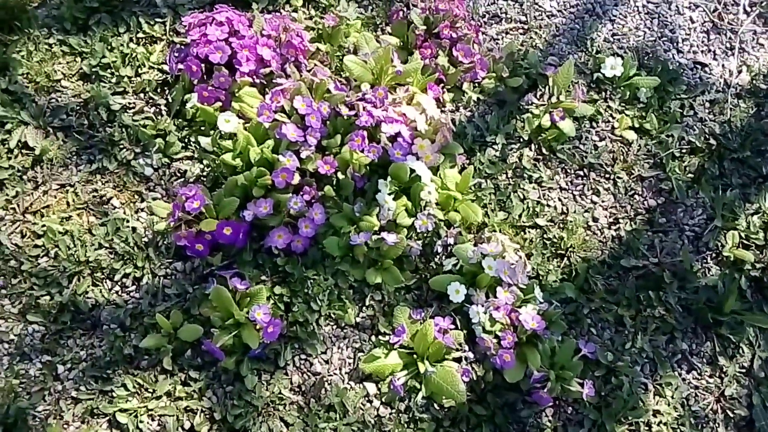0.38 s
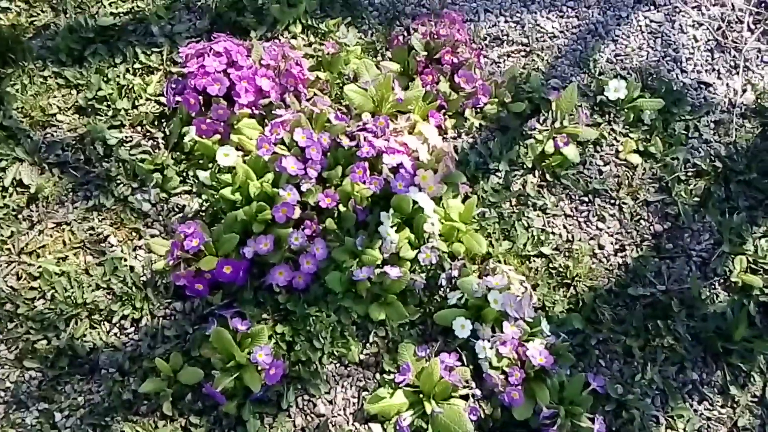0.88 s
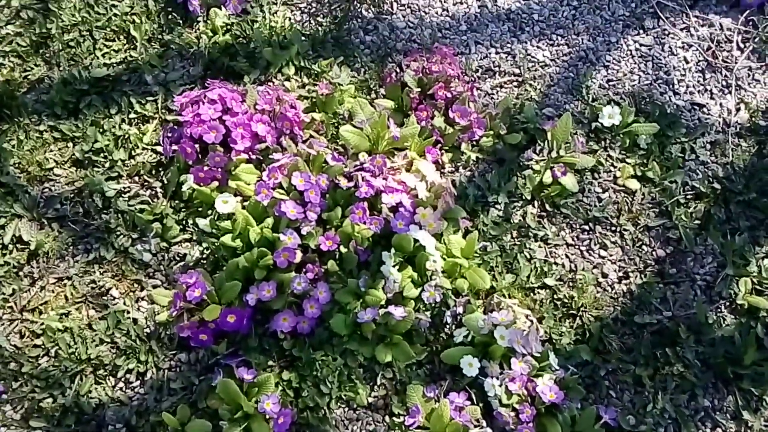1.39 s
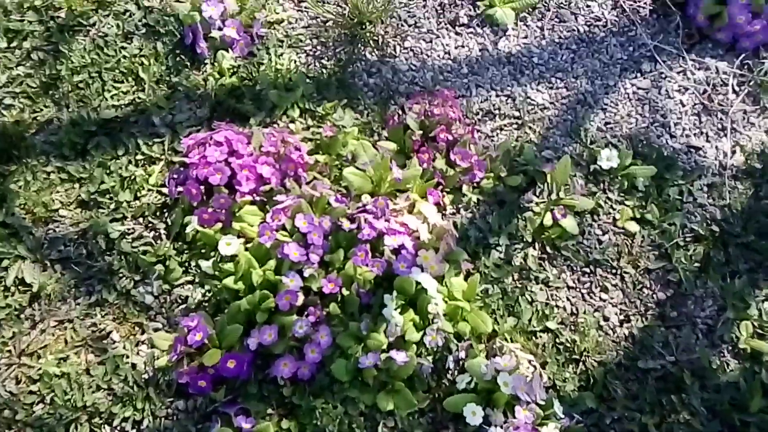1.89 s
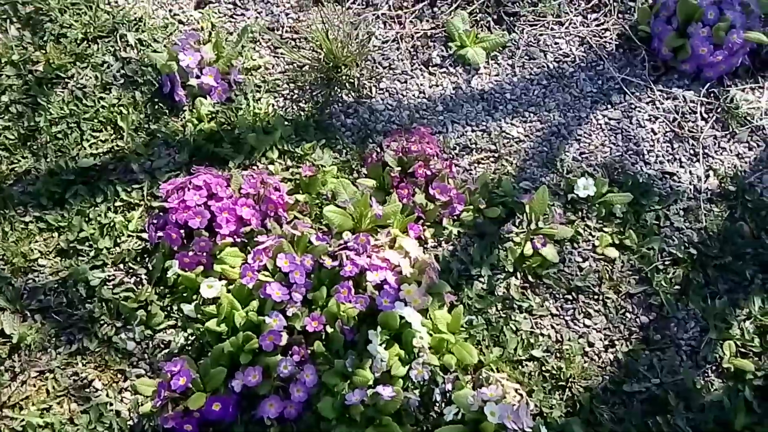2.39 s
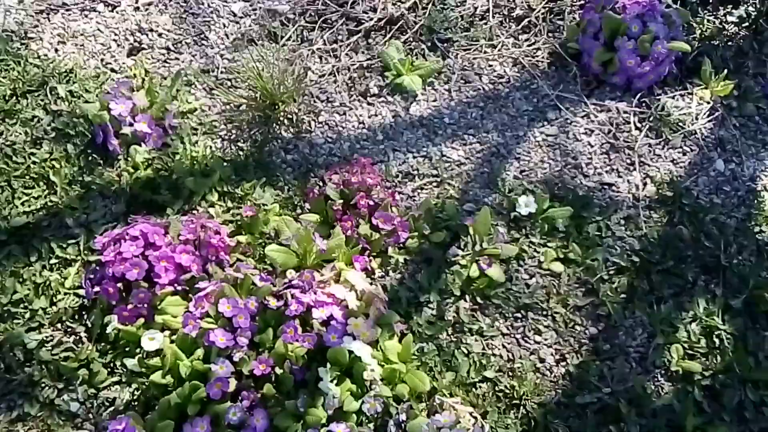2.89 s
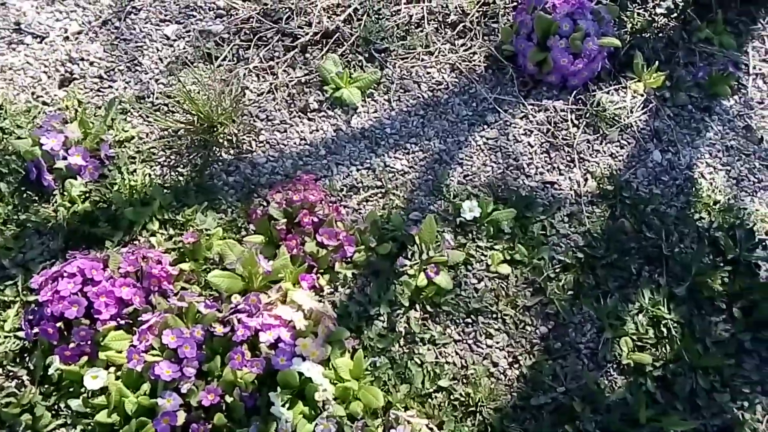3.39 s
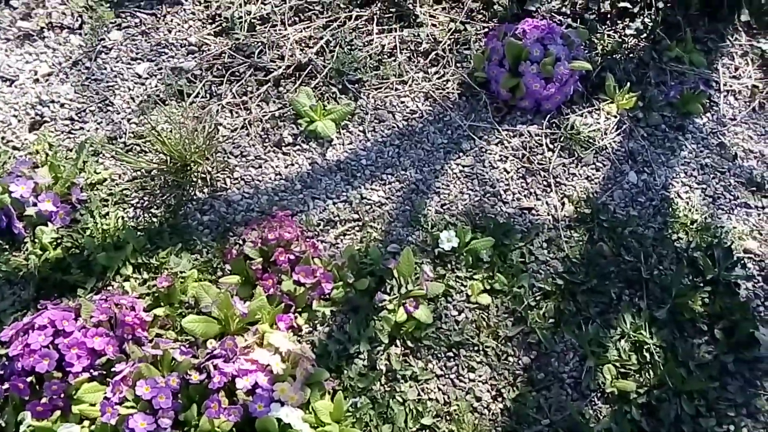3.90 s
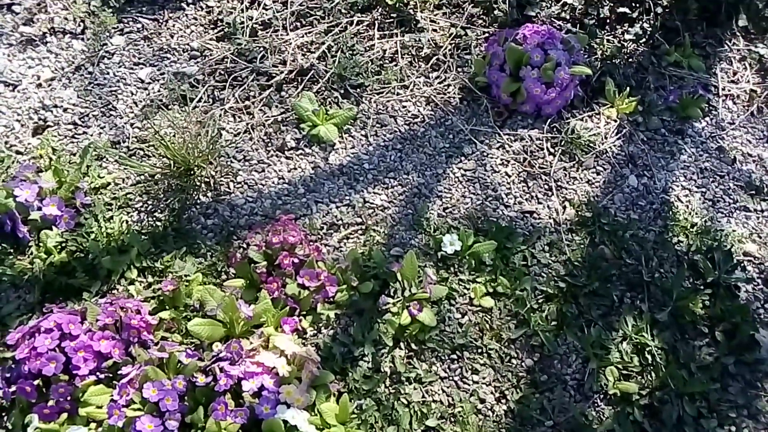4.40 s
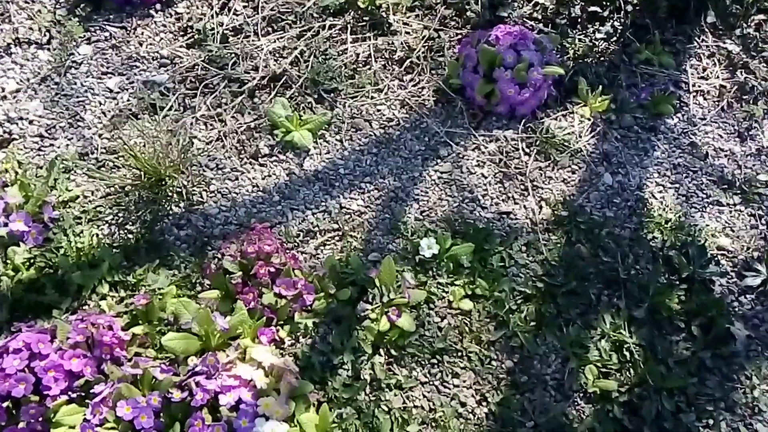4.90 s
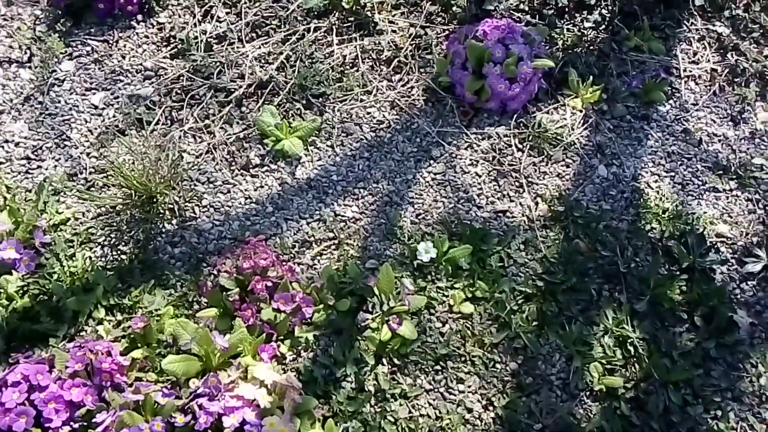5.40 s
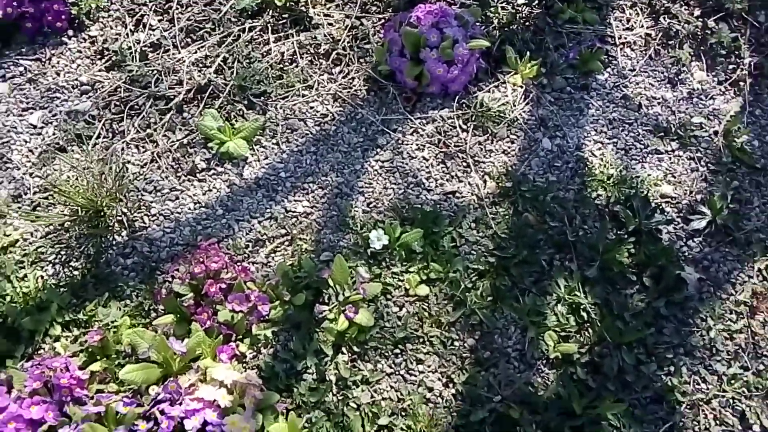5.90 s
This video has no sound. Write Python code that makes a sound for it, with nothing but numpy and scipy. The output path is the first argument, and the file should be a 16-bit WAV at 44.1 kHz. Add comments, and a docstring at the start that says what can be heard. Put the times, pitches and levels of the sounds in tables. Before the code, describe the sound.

Quick two-note birdsong over soft outdoor hiss and distant twitter, with two small knocks, gives way to heavy, lumpy wind thumps.

```python
"""Hiss, a far hum and faint wind rumble open this breezy garden; a small bird soon calls buzzy high and pure low notes.
Its notes are warbled or sinking sines with a late return off a far wall; other birds are short glides farther off.
Two small knocks nearby ring in short modes, and a soft hollow tone swells far away as flickering sine.
In the second half gusts buffet the microphone: lumpy filtered noise and single low swings of pressure."""
import sys
import numpy as np
from scipy import signal
from scipy.fft import rfft, irfft, next_fast_len
from scipy.io import wavfile

SR = 44100
rng = np.random.default_rng(int(sys.argv[2]) if len(sys.argv) > 2 else 0)


def boost_factor(decibels):
    """Convert a level in decibels to a linear amplitude factor."""
    exponent = np.asarray(decibels, float) / 20
    return 10 ** exponent


def unload_wav(signal):
    """Save mono or channel-first audio to the path in sys.argv[1] as 16-bit WAV at rate SR, clipped to [-1, 1]."""
    wavfile.write(
        sys.argv[1],
        SR,
        np.round(np.clip(np.atleast_2d(signal).T, -1, 1) * 32767).astype(np.int16),
    )


N = 265482   # samples
WARBLE_HZ = 206.02   # the bird's fast warble
GARDEN_T60_S = 0.28   # the garden's echoes die by 60 dB in this time


def rms_one(x):
    """Scale to unit power."""
    return x / np.sqrt(np.mean(np.abs(x) ** 2) + 1e-20)


def in_time(rows, t):
    """Each column of a curve, read at times t."""
    s, *columns = np.transpose(rows)
    return [np.interp(t, s, column) for column in columns]


def drift(rate_hz, size=N):
    """Slow chance: noise twice through a one-pole low-pass; spread 1."""
    pole = np.exp(-2 * np.pi * rate_hz / SR)
    settle = 8000   # samples dropped while the filter starts up
    noise = rng.standard_normal(size + settle)
    slow = signal.lfilter([1], [1, -2 * pole, pole * pole], noise)[settle:]
    return rms_one(slow - slow.mean())


def coloured(spectrum):
    """Noise with the given spectrum; rms 1."""
    size = next_fast_len(N)
    hz, db = np.transpose(spectrum)
    bins_hz = np.fft.rfftfreq(size, 1 / SR)
    shape = boost_factor(np.interp(np.log(bins_hz + 1), np.log(hz), db))
    return rms_one(irfft(rfft(rng.standard_normal(size)) * shape, size)[:N])


def band(x, low_hz, high_hz):
    """Butterworth band-pass."""
    return signal.sosfilt(signal.butter(2, [low_hz, high_hz], "band", fs=SR, output="sos"), x)


def add(out, start_s, sound):
    """Mix a sound in at its time."""
    i = max(round(start_s * SR), 0)
    out[i:i + len(sound)] += sound[:N - i]


def hump(t, length_s):
    """A smooth rise and fall centred on t = 0."""
    return np.cos(np.pi * np.clip(t / length_s, -.5, .5)) ** 2


def echoes(x, t60_s):
    """Many small reflections off leaves and walls: noise dying away, unit energy."""
    t = np.arange(0, t60_s, 1 / SR)
    paths = rng.standard_normal(len(t)) * boost_factor(-60 * t / t60_s)
    return signal.fftconvolve(x, paths / np.sqrt(np.sum(paths ** 2)))[:len(x)]


def whistle(hz, scattered, flutter_hz, spread_s=.0):
    """A sine of about rms 1; the share arriving by many echo paths flutters and, if spread in time, smears."""
    share = np.clip(scattered, 0, 1)
    paths = (drift(flutter_hz, size=len(hz)) + 1j * drift(flutter_hz, size=len(hz))) / np.sqrt(2)
    carrier = np.sqrt(2) * np.exp(2j * np.pi * np.cumsum(hz) / SR)
    late = np.real(carrier * paths)
    if spread_s:
        late = rms_one(echoes(late, spread_s))
    return np.sqrt(1 - share) * carrier.real + np.sqrt(share) * late


def background():
    """Hiss that breathes a little, a wavering hum and a far hollow tone that swells and fades."""
    t = np.arange(N) / SR
    # far machine hum: (time [s], level [dB])
    hum_level = [(0, -85), (2.9, -82.5), (3.4, -90), (6.02, -91)]
    hum = boost_factor(in_time(hum_level, t)[0]) * whistle(np.full(N, 296.25), 0.3, flutter_hz=5.5)
    # soft hollow tone far off: (time of the top [s], length [s], peak level [dB])
    swell_rows = [(3.955, 0.179, -74.5), (4.563, 0.174, -76), (4.852, 0.126, -70.5), (4.963, 0.096, -79.5),
                  (5.504, 0.129, -77)]
    swells = sum(boost_factor(db) * hump(t - s, length_s) for s, length_s, db in swell_rows)
    swell_hz = 551 * (1 + .07 * drift(4))
    hollow = swells * whistle(swell_hz, .95, flutter_hz=70)
    # far traffic, leaves and preamplifier hiss, spectrum shape: (frequency [Hz], relative level [dB per Hz])
    air_shape = [(35, -30.5), (60, -5.5), (134, 2), (242, -11.5), (340, -12), (500, -11.5), (1000, -17),
                 (2000, -21), (4200, -23.5), (6500, -27), (8000, -34), (13600, -35.5), (15000, -26),
                 (16000, -35)]
    hiss = boost_factor(-73 + 0.44 * drift(4.7)) * coloured(air_shape)
    return hiss + hum + hollow


def wind():
    """Turbulence on the microphone: lumpy rumble, an upper edge of changing strength, single lumps of pressure."""
    # gusts: (time [s], rumble level [dB], upper edge relative to the rumble [dB])
    gusts = [(0, -82, -1.5), (.46, -76, -2), (1.55, -78, -3.5), (2.1, -80, -1), (2.5, -75.5, -2.5),
             (3.25, -71, -5.5), (3.49, -81.5, -9.5), (3.56, -59, -2), (3.7, -45.5, -6.5), (3.79, -53.5, -1),
             (3.9, -52.5, -30.5), (4.0, -57.5, -24), (4.09, -52.5, 2), (4.16, -51.5, -24.5),
             (4.29, -69, -15), (4.39, -58, -18.5), (4.45, -70.5, -14.5), (4.6, -54, -13.5),
             (4.69, -54.5, -31), (4.85, -55, -20.5), (4.94, -69, -12), (5.05, -73, -8.5),
             (5.12, -57.5, 11.5), (5.2, -54.5, -11.5), (5.3, -54.5, -22.5), (5.75, -53, -24.5),
             (5.85, -41.5, -19.5), (5.92, -56, -25), (5.96, -54, 0), (6.0, -39.5, 9.5)]
    # spectrum shape of the rumble: (frequency [Hz], relative level [dB per Hz])
    rumble_shape = [(12, -49), (20, -27.5), (55, 4), (91, 3), (146, -1.5), (260, -27), (340, -49.5),
                    (570, -120)]
    # single lumps of pressure: (time of the top [s], peak level [dB], frequency [Hz], length [s])
    buffets = [(.383, -59.5, 139.3, 0.0404), (0.752, -62, 109.2, 0.035), (1.24, -62, 87, 0.0506),
               (3.004, -50, 70.6, 0.03304), (3.033, -55, 107.3, 0.0468), (3.287, -60.5, 119, 0.0275),
               (3.542, -45.5, 70.6, 0.061), (3.595, -30, 114.6, 0.0257), (3.618, -39, 97, 0.051),
               (3.657, -33, 130.3, 0.0152), (3.725, -35, 165, 0.0376), (3.739, -38, 105, .084),
               (3.751, -35, 80, 0.0324), (3.785, -27.5, 141, 0.0146), (3.84, -32.5, 81.6, 0.0458),
               (4.039, -34, 107.5, 0.0209), (4.09, -28, 108, 0.0247), (4.204, -47, 82.5, 0.0396),
               (4.381, -46, 92.3, 0.0274), (4.598, -40.5, 89, 0.0229), (4.814, -46.5, 110.6, 0.036),
               (4.879, -37.5, 93.2, 0.0227), (5.051, -42, 78.8, 0.044), (5.108, -33, 105.4, .033),
               (5.135, -29.5, 120.2, 0.0232), (5.162, -28.5, 116, 0.0114), (5.238, -36, 100.4, 0.0252),
               (5.294, -39.5, 83, 0.0392), (5.445, -42.5, 89, 0.0408), (5.468, -42, 87.2, 0.0234),
               (5.651, -45, 110.7, 0.0327), (5.812, -30, 86.7, 0.0221), (5.858, -29.5, 110.2, 0.0287),
               (5.979, -25.5, 108.8, 0.038), (6.01, -23.5, 138.2, 0.0119)]
    rumble_db, edge_db = in_time(gusts, np.arange(N) / SR)
    lumps = boost_factor(2.715 * drift(15))   # chance swings of level, spread in dB
    rumble = rms_one(lumps * coloured(rumble_shape))
    edge_noise = band(band(rng.standard_normal(N), 158.3, 274.1), 95, 330)
    edge = rms_one(lumps * edge_noise)
    out = boost_factor(rumble_db) * (rumble + boost_factor(edge_db) * edge)
    for s, db, hz, length_s in buffets:
        t = np.arange(-length_s / 2, length_s / 2, 1 / SR)
        swing = np.sin(2 * np.pi * hz * t + rng.uniform(0, 2 * np.pi))
        add(out, s + t[0], boost_factor(db) * np.hanning(len(t)) * swing)
    return out


def glides(rows):
    """Short whistled glides; the fainter the bird, the more its sound is scattered and wavers."""
    near_db, far_db = -67, -79.5   # between these levels a bird passes from near to far
    out = np.zeros(N)
    for s, length_s, start_hz, end_hz, db in rows:
        far = np.clip((near_db - db) / (near_db - far_db), 0, 1)
        t = np.arange(0, length_s, 1 / SR)
        sung = np.clip(np.minimum(t / 0.0048, (length_s - t) / 0.00934), 0, 1)   # rise and release [s]
        waver = 1 + (.005 + 0.0073 * far) * drift(90, size=len(t))
        hz = np.interp(t, [0, length_s], [start_hz, end_hz]) * waver
        add(out, s, boost_factor(db) * sung * whistle(hz, 0.22 + .5 * far, flutter_hz=70.3))
    return out


def far_birds():
    """Some chirps come clearly with the garden's echoes; the farthest arrive only as blurred twitter."""
    # clear chirps before echoes: (time [s], length [s], start pitch [Hz], end pitch [Hz], level [dB])
    chirps = [(.2, 0.044, 5940, 5800, -83.5), (.27, 0.073, 3142, 2998, -80.5),
              (.57, 0.049, 4170, 4184, -77.5), (.575, 0.02, 3200, 2930, -73.5),
              (.91, 0.066, 7435, 7225, -81.5), (1.08, 0.068, 4906, 4850, -82.5),
              (1.07, 0.076, 5522, 5572, -79.5), (1.4, 0.08, 5680, 5557, -78.5),
              (1.504, 0.029, 4190, 4112, -78.5), (1.865, 0.0482, 5250, 5200, -67),
              (2.425, 0.041, 5053, 5350, -72.5), (2.58, 0.0483, 3640, 3714, -78.5),
              (2.87, 0.042, 5188, 5485, -74.5), (3.188, 0.0188, 5167, 3531, -72.5),
              (3.26, 0.0347, 3750, 3750, -79), (3.279, 0.054, 6943, 7115, -80.5),
              (3.291, 0.0268, 5159, 5455, -60.5), (3.295, 0.089, 5833, 5655, -76.5),
              (3.34, .02, 6530, 6600, -79), (3.359, 0.0248, 4943, 2873, -78.5),
              (3.45, 0.069, 5250, 5346, -79.5), (3.49, 0.0163, 5144, 3200, -74.5),
              (3.98, 0.0297, 4973, 5177, -68), (4.06, 0.0134, 4990, 4580, -77.5),
              (4.214, 0.031, 3708, 3400, -79), (4.285, 0.0155, 3757, 3740, -79),
              (4.325, 0.0233, 3470, 2820, -77.5), (4.46, 0.0403, 5310, 4980, -78),
              (4.91, 0.0296, 3019, 2725, -75), (5.05, 0.072, 5160, 5260, -82.5),
              (5.11, .03, 3904, 4634, -79.5), (5.12, 0.0271, 2060, 2000, -77),
              (5.18, .06, 8460, 8510, -92.5), (5.2, 0.04, 5465, 4980, -79),
              (5.4, 0.0658, 2460, 2457, -67.5), (5.45, 0.068, 1880, 1850, -80),
              (5.52, 0.0646, 2532, 2443, -71), (5.525, 0.0115, 6240, 3810, -72.5),
              (5.545, 0.04, 3580, 3650, -76), (5.56, 0.0186, 7080, 7050, -79),
              (5.575, 0.0754, 2345, 2196, -73.5), (5.68, 0.0374, 2148, 2166, -79),
              (5.795, 0.032, 5510, 5435, -64.5), (5.797, 0.0389, 4442, 5340, -63),
              (5.82, 0.0147, 4960, 3870, -65), (5.845, 0.0606, 5000, 5318, -73.5),
              (5.868, 0.0163, 3927, 4090, -61.5), (5.875, 0.0139, 4358, 4870, -60),
              (5.884, 0.0137, 3720, 4035, -71.5), (5.924, 0.0188, 4000, 4000, -70),
              (5.965, .02, 5800, 5854, -76)]
    chatter_per_s, chatter_db = 30.0, -91   # mean rate and lowest level of the faintest birds
    chance = rng.random((300, 5))
    starts = np.cumsum(-np.log(chance[:, 0])) / chatter_per_s   # random gaps
    faint = []
    for s, (a, b, c, d) in zip(starts, chance[:, 1:]):
        if s < N / SR:
            start_hz = 1500 * 4.5 ** b
            faint.append((s, .015 + .05 * a, start_hz, start_hz * (.85 + .25 * c), chatter_db + 8 * d))
    clear = glides(chirps)
    blurred = echoes(glides(faint), .15)
    return clear + boost_factor(-5.5) * echoes(clear, GARDEN_T60_S) + blurred


def loudness(t, db, echo, attack_s, fade_db_per_s, sung_s, release_db_per_s):
    """Quick rise, slow fade while sung, faster fade after, plus the late echo."""
    delay_s, length_s, echo_db = echo
    fade_db = fade_db_per_s * np.maximum(t - attack_s, 0)
    release_db = release_db_per_s * np.maximum(t - sung_s, 0)
    sung = np.clip(t / attack_s, 0, 1) ** 2 * boost_factor(db - fade_db - release_db)
    return sung + boost_factor(echo_db) * hump(t - delay_s, length_s)


def high_notes():
    """Buzzy notes: a fast warble splits each into a comb of lines; its later part is mostly scattered."""
    # each note and its echo off a far wall: (time [s], peak level [dB], pitch offset [Hz],
    # echo delay [s], echo length [s], echo level [dB])
    notes = [(.245, -68, 151, 0.25, 0.082, -90), (0.771, -57.5, -9.5, 0.1878, 0.102, -71),
             (1.339, -57.5, 1, 0.244, 0.1116, -73.5), (1.908, -54, -80, 0.2462, 0.122, -72),
             (2.487, -54.5, 1, 0.223, 0.074, -81.5), (3.065, -53, -16.5, 0.2, 0.101, -77)]
    # shape of every buzzy note: (time after its start [s], pitch before the offset [Hz], warble depth [Hz])
    buzz_shape = [(0, 5120, 60), (.03, 5018, 200), (.06, 5000, 313), (.1, 4926, 275), (.3, 4970, 200)]
    out, t = np.zeros(N), np.arange(0, .45, 1 / SR)
    centre, depth = in_time(buzz_shape, t)
    scattered = np.interp(t, [0, .06, .11], [.2, .5, .9])
    for s, db, shift_hz, *echo in notes:
        warble_hz = WARBLE_HZ * (1 + 0.043 * drift(30, size=len(t)))   # slightly uneven
        warble = np.sin(2 * np.pi * np.cumsum(warble_hz) / SR)
        hz = centre + shift_hz + depth * warble + 32 * drift(55, size=len(t))
        buzz = whistle(hz, scattered, flutter_hz=34.5, spread_s=0.1)
        buzz = rms_one(band(buzz, 4560 + shift_hz, 5250 + shift_hz))   # the throat favours the middle lines
        level = loudness(t, db, echo, attack_s=0.0321, fade_db_per_s=87, sung_s=0.1248, release_db_per_s=228)
        add(out, s, level * buzz)
    return out


def low_notes():
    """Pure notes that sink a little: nearly direct at first, then partly scattered."""
    # each note and its echo off a far wall: (time [s], peak level [dB], pitch offset [Hz],
    # echo delay [s], echo length [s], echo level [dB])
    notes = [(0.5, -71, -1, 0.245, 0.0973, -68.5), (1.036, -63.5, 11.5, 0.2696, 0.291, -69),
             (1.596, -61.5, -11.5, 0.271, 0.285, -68), (2.185, -57.5, 0, 0.2558, 0.169, -72.5),
             (2.772, -59.5, -46, 0.319, 0.1265, -78)]
    # shape of every low note: (time after its start [s], pitch before the offset [Hz])
    pitch_shape = [(0, 3567), (.03, 3522), (.07, 3450), (.2, 3465), (.4, 3396)]
    out, t = np.zeros(N), np.arange(0, .45, 1 / SR)
    trace = 25 * np.exp(-t / 0.081) * np.sin(2 * np.pi * WARBLE_HZ * t)   # a little warble at the start
    scattered = np.interp(t, [0, .07, .13], [.02, .15, .4])
    for s, db, shift_hz, *echo in notes:
        hz = in_time(pitch_shape, t)[0] + shift_hz + trace
        level = loudness(t, db, echo, attack_s=0.01115, fade_db_per_s=53, sung_s=0.1883, release_db_per_s=244.5)
        add(out, s, level * whistle(hz, scattered, flutter_hz=45.0))
    return out


def songbird():
    """The small bird's low and high notes with a faint tail of garden echoes."""
    song = low_notes() + high_notes()
    return song + boost_factor(-15.5) * echoes(song, GARDEN_T60_S)


def knocks():
    """Something small is struck softly: short modes, a dull scatter, a hollow after-ring and a low thump."""
    # knocks, levels before the trims below: (time [s], click [dB], thump [dB], hollow after-ring [dB],
    # fall-off of the modes away from 2250 Hz [dB per octave], ring length factor [1])
    strikes = [(1.8683, -46, -46, -71, 0, 0.617), (4.816, -43.5, -64.5, -63.5, 26.5, 0.955)]
    # modes before fall-off and ring factor: (frequency [Hz], level [dB], time to die by 60 dB [s])
    modes_table = [(1255, -9, 0.069), (1807, 1.5, 0.0287), (2256, 1.5, 0.041), (2657, -1, 0.0446),
                   (3200, -5.5, 0.0367), (4000, -13, 0.027), (5800, -18, 0.029)]
    out, t = np.zeros(N), np.arange(0, .15, 1 / SR)
    soft = 1 - np.exp(-t / 0.0007)   # the contact takes a moment
    late = 1 - np.exp(-t / 0.00438)   # scatter and hollow ring build up later
    for s, click_db, thump_db, hollow_db, fall_db, ring in strikes:
        modes = np.zeros(len(t))
        for hz, db, t60_s in modes_table:
            mode_db = db - fall_db * abs(np.log2(hz / 2250)) - 60 * t / (t60_s * ring)
            modes += boost_factor(mode_db) * np.sin(2 * np.pi * hz * t + rng.uniform(0, 2 * np.pi))
        dull = band(band(rng.standard_normal(len(t)), 1630, 2950), 1000, 2730)
        scatter = boost_factor(-7.0 - 60 * t / (0.119 * ring)) * rms_one(dull)
        hollow_noise = rms_one(band(rng.standard_normal(len(t)), 377, 665))
        hollow = boost_factor(hollow_db + 6.5 - 60 * t / 0.135) * hollow_noise
        thump = boost_factor(thump_db + 6.0 - 60 * t / 0.059) * np.cos(2 * np.pi * 140 * t)
        click = boost_factor(click_db - 3.5) * (soft * modes + late * scatter)
        add(out, s - .001, click + late * hollow + soft * thump)
    return out


def scene():
    """All sources at one microphone."""
    return (songbird() + far_birds() + knocks() + wind() + background())[None, :]


def band_limit(x):
    """A steep low-pass at the top of the band."""
    return signal.sosfilt(signal.butter(12, 15720, fs=SR, output="sos"), x)


def record(dry):
    """The finished mix from the one microphone, as it is kept."""
    return band_limit(dry)


dry = scene()
out = record(dry)
unload_wav(out)
```